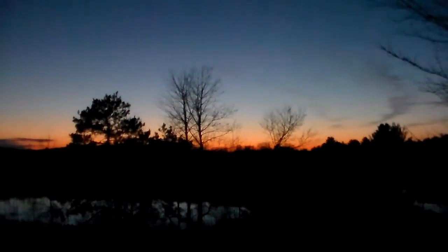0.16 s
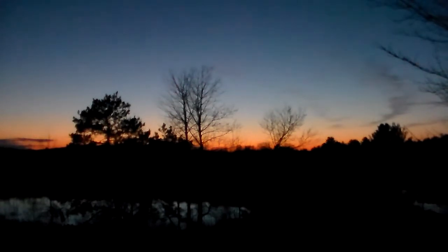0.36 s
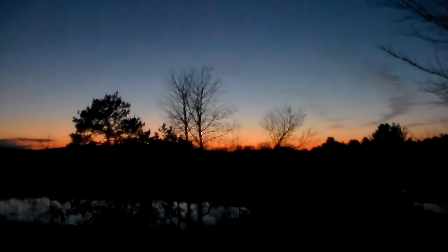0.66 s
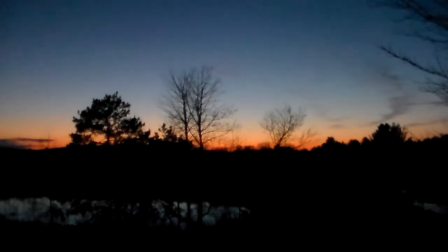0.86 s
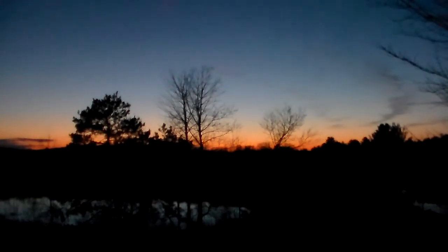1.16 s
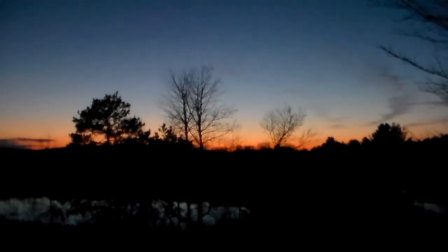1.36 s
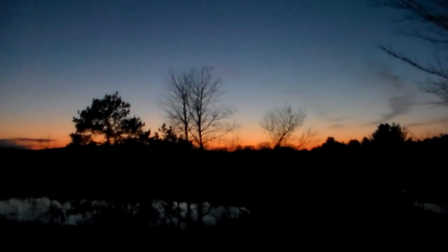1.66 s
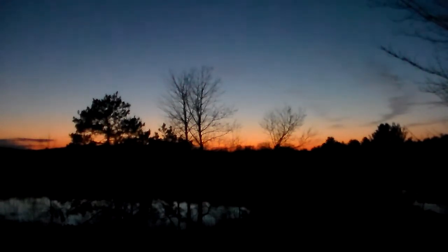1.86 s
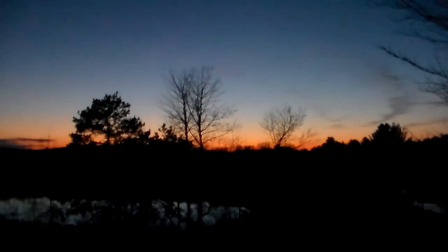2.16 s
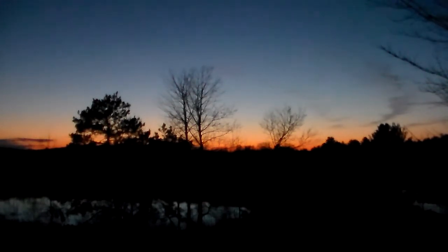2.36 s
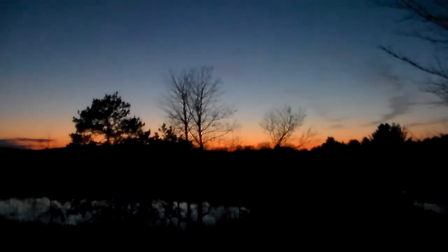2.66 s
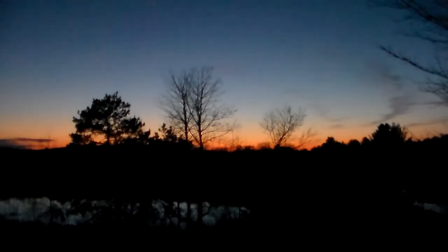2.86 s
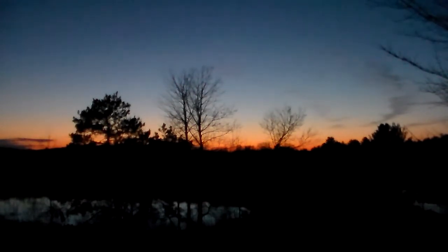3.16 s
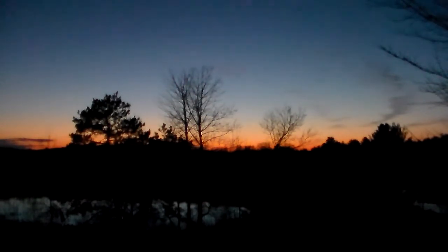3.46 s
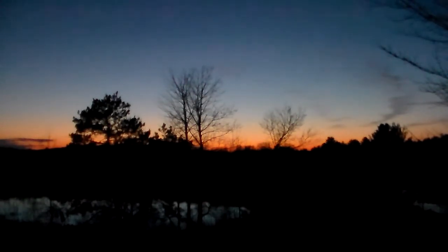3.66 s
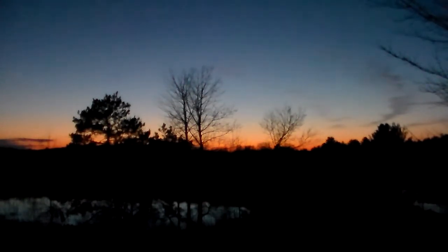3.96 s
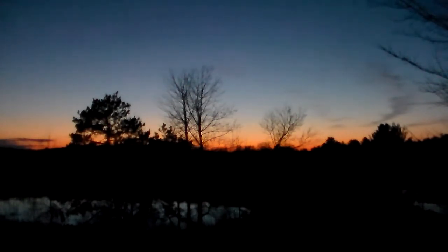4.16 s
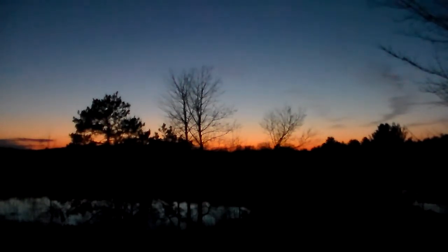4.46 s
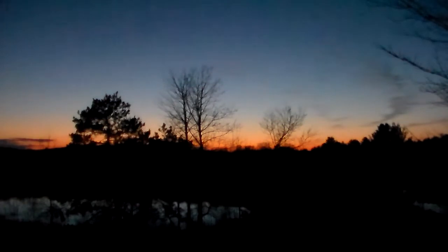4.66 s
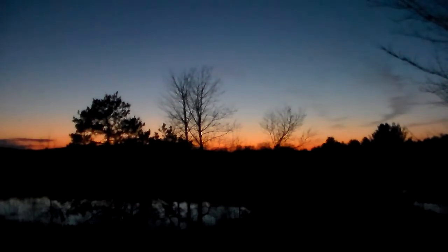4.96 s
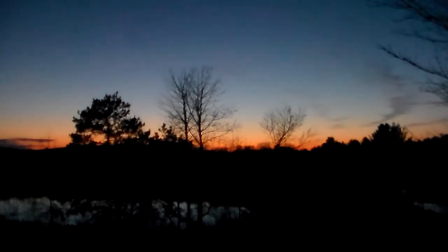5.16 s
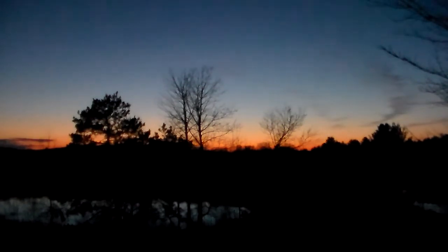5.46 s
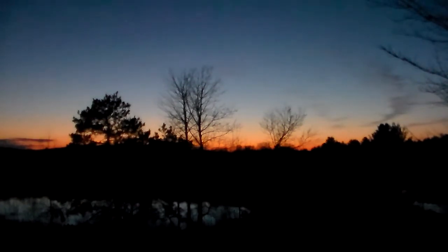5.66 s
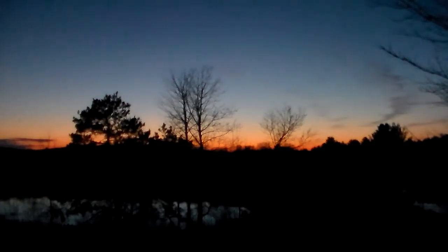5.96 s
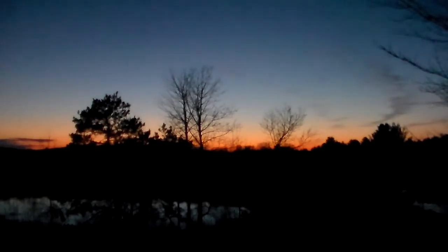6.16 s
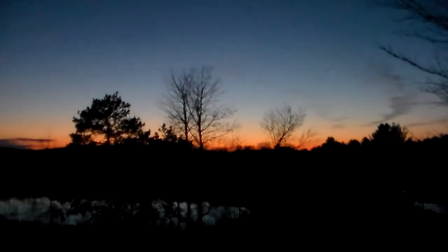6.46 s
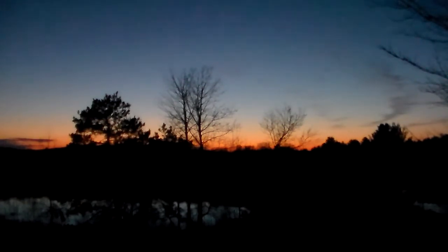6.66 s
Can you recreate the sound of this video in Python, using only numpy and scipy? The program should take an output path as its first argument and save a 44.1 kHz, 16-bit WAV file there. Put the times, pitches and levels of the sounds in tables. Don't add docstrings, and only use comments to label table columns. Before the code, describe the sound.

A marsh at dusk, heard in stereo through a small camera microphone. A dense, continuous crowd of tiny frogs shimmers in the distance while nearer ones give short, clear rising peeps, higher on the left and lower on the right. A vehicle's low rumble and tyre haze draw away early. Faint bird chips, whistles and three tiny nasal buzzes slip between the peeps, over light hiss.

```python
import sys
import numpy as np
from scipy import signal
from scipy.fft import rfft, irfft, next_fast_len
from scipy.io import wavfile
from scipy.ndimage import uniform_filter1d

SR = 44100
rng = np.random.default_rng(int(sys.argv[2]) if len(sys.argv) > 2 else 0)


def generate_wav(sig):
    pcm = np.round(np.clip(np.atleast_2d(sig).T, -1, 1) * 32767).astype(np.int16)
    wavfile.write(sys.argv[1], SR, pcm)


def gain_from_decibels(decibels):
    exponent = np.asarray(decibels, float) / 20
    return 10 ** exponent


N = 300321

# time in seconds, engine rumble in dB, tyre haze in dB.
TRAFFIC_LEVELS = [
    (0, -42, -40),
    (.3, -44.5, -43.5),
    (.85, -45, -43.5),
    (1.2, -51, -44.5),
    (1.9, -47, -45),
    (2.5, -50.5, -45),
    (4.2, -52, -45),
    (5.6, -52, -44),
    (6.81, -52.5, -44.5),
]
# pitch in Hz, level in dB per Hz.
RUMBLE_COLOUR = [(20, 1.5), (45, 0), (110, -1), (200, 0), (250, 2), (500, -80)]
DRONE_COLOUR = [(100, -56), (230, -9), (290, 5.5), (350, -4.5), (420, -1), (600, -5), (1200, -77)]
HAZE_COLOUR = [(480, -11), (650, -7.5), (850, -0.5), (1100, -2.5), (1500, -8.5), (2100, -14.5), (3600, -18),
               (4900, -41), (7000, -70)]
# pitch in Hz, likeness from 0 to 1.
ROAD_LIKENESS = [(60, 0.81), (300, 0.98), (700, 0.92), (2000, 0.83), (5000, 0.49)]
# pitch in Hz, width in Hz, level in dB.
ENGINE_TONES = [
    (673, 50, -55),
    (856.4, 24, -59.5),
    (1552, 37, -63.5),
]
# time in seconds, level in dB.
CHORUS_LEVELS = [(0, -27), (.45, -29.5), (.9, -29), (1.3, -27.5), (1.8, -28.5), (2.3, -28.5), (2.8, -29),
                 (3.2, -29.5), (3.6, -28), (4, -29.5), (4.3, -30), (4.7, -27.5), (5.2, -29), (5.7, -28),
                 (6.2, -29), (6.81, -28.5)]
# pitch in Hz, level in dB.
CROWD_COLOUR = [(2280, -30), (2400, -11.5), (2580, -1), (3000, 0.5), (3150, -10), (3240, -18.5),
                (3620, -41), (3850, -25), (4500, -27), (4800, -47), (5100, -46), (5600, -36), (5900, -44.5),
                (6200, -61)]
# start in seconds, length in seconds, start and end pitch in Hz, peak in dB.
FAINT_WHISTLES = [(.13, .25, 1890, 1985, -55), (2.74, .21, 1900, 1980, -55), (4.74, .1, 1990, 1900, -59),
                  (4.82, .19, 1900, 1990, -55), (.735, .08, 2420, 2240, -49), (.79, .09, 2225, 2370, -49),
                  (3.35, .07, 2380, 2240, -50), (3.4, .09, 2240, 2320, -50), (4.69, .07, 2380, 2240, -52),
                  (4.74, .08, 2240, 2320, -52), (4.27, .17, 2080, 2190, -58), (-.01, .065, 4090, 4330, -44),
                  (6.05, .12, 2240, 2220, -58), (3.42, .06, 3900, 3540, -48), (5.32, .07, 1150, 1170, -48),
                  (1.585, .16, 2330, 2470, -40), (3.99, .14, 2290, 2450, -39),
                  (3.375, .05, 4170, 4280, -45)]
# time in seconds, peak in dB.
FALLING_CHIPS = [
    (0.7994, -55),
    (0.8545, -35),
    (1.294, -39),
    (2.3645, -38),
    (3.4203, -38),
    (4.2004, -36),
    (5.5717, -35),
]
# time in seconds, peak in dB, pitch in Hz.
LEVEL_CHIPS = [
    (0.8175, -58, 4250),
    (1.3234, -58.5, 4180),
    (4.7461, -57, 4170),
    (5.5378, -57.5, 4150),
    (6.2876, -55, 4150),
]
# start in seconds, length in seconds, level in dB.
BUZZ_CALLS = [
    (0.138, .21, -58.5),
    (2.881, 0.2, -59.5),
    (5.545, 0.22, -58),
]
# pitch in Hz, level in dB.
BEAK_COLOUR = [(3900, -7), (4500, -2), (5000, -4), (5410, 0), (5800, -7), (6500, -18)]
# start in seconds, length in seconds, peak in dB.
HIGH_PEEPS = [
    (.722, .105, -33.5),
    (2.1, .125, -33),
    (3.468, .125, -34.5),
    (4.965, .115, -34),
    (6.118, .105, -33.5),
]
LOW_PEEPS = [
    (1.6, .3, -46),
    (3.88, .27, -47),
    (6.165, .24, -46),
]
# length in seconds, start and end pitch in Hz, peak in dB, left over right in dB.
LEFT_VOICES = [
    (.09, 3180, 3300, -43.5, .8),
    (.1, 3065, 3180, -30.5, 1.5),
    (.13, 2870, 3100, -31.3, 5.5),
    (.07, 2930, 3080, -27, 3.5),
    (.18, 2845, 3210, -35.2, 2),
    (.18, 2750, 3040, -33, 4),
    (.1, 2770, 3000, -29.5, 4),
    (.08, 3255, 3345, -43.5, 0),
]
# start times in seconds, for one frog.
LEFT_TIMES = [
    (.83, 2.042, 3.886, 5.105, 6.27),
    (.1, .29, 1.44, 2.724, 3.661, 4.118, 5.07, 5.33, 5.787, 6.648),
    (.232, 1.394, 2.28, 3.855, 3.989, 4.339, 5.749, 6.686),
    (1.82, 3.947, 5.105),
    (0, .747, 2.194, 4.659, 6.01, 6.59),
    (.24, .872, 1.105, 1.943, 2.674, 5.15, 5.269, 5.45, 6.145),
    (1.848, 1.92, 3.162, 4.565, 4.715, 5.81),
    (.36, 1.575, 3.03),
]
# length in seconds, start and end pitch in Hz, peak in dB, left over right in dB.
RIGHT_VOICES = [(.18, 2335, 2640, -30.5, -1), (.075, 2340, 2410, -33.5, -1), (.12, 2265, 2450, -35, -.5),
                (.1, 2325, 2435, -38.5, -1), (.13, 2410, 2610, -33.5, -2), (.18, 2395, 2680, -35, -3.5),
                (.18, 2490, 2860, -33.3, -4), (.26, 2480, 2890, -34.2, -1.5),
                (.13, 2480, 2790, -30.5, -4.5), (.08, 2610, 2770, -28, -5), (.13, 2690, 2960, -31.2, -1.5),
                (.18, 2595, 2930, -33.4, -1.6), (.06, 2470, 2580, -28, -1.1), (.06, 2745, 2835, -26, -1.6)]
# start times in seconds, for one frog.
RIGHT_TIMES = [(.895, 2.175, 3.53, 4.731), (0, 1.257, 2.309, 3.406, 4.434, 5.935), (.968, 2.663, 5.47),
               (.225, 2.88, 4.274, 5.543),
               (1.525, 2.915, 3.379, 3.535, 4.053, 5.109, 5.573, 5.768, 6.24, 6.455),
               (.06, 1.28, 2.12, 2.347, 2.579, 2.68, 3.333, 4.7, 5.23),
               (.008, .175, .63, 2.389, 4.555, 5.41, 5.528, 5.85, 5.943),
               (1.078, 1.105, 1.49, 2.19, 4.66, 6.2), (1.12, 1.955, 2.415, 3.125, 3.34, 4.484, 4.985),
               (.165, 1.51, 2.225, 4.069, 4.305, 5.44), (.93, 1.79, 3.375, 4.055, 4.74, 5.585),
               (2.925, 4.41, 6.525), (2.665, 3.87, 4.875), (.236, 6.762)]
# pitch in Hz, level in dB per Hz.
HISS_COLOUR = [(1500, -40), (4000, 0.5), (8000, -4), (14000, -6)]
# pitch in Hz, level in dB.
WHINE_TONES = [
    (7792, -91),
    (7822, -88),
    (7852, -77.5),
    (7882, -79),
    (7912, -93),
]


def unit(x):
    return x / np.sqrt(np.mean(x ** 2) + 1e-20)


def along(points, hz):
    f, v = np.transpose(points)
    return np.interp(np.log(hz + 1), np.log(f + 1), v)


def curves(rows):
    s, *columns = np.transpose(rows)
    return [np.interp(np.arange(N) / SR, s, column) for column in columns]


def filtered(x, response):
    m = next_fast_len(N + SR // 2)
    return irfft(rfft(x, m) * response(np.fft.rfftfreq(m, 1 / SR)), m)[..., :N]


def smooth_noise(count, size):
    return unit(uniform_filter1d(rng.standard_normal(count), size=size))


def rush(colour, likeness, patchy_db=0.):
    z = signal.stft(rng.standard_normal((2, N)), nperseg=2048)[2]
    patches = uniform_filter1d(rng.standard_normal(z.shape[1:]), size=4, axis=0)
    patches = unit(uniform_filter1d(patches, size=5, axis=1))
    pair = signal.istft(z * gain_from_decibels(patchy_db * patches), nperseg=2048)[1][:, :N]

    def middle_and_side(hz):
        turn = np.arccos(np.clip(along(likeness, hz), -1, 1)) / 2
        return gain_from_decibels(along(colour, hz)) * np.array([np.cos(turn), np.sin(turn)])

    mid, side = filtered(pair, middle_and_side)
    return unit(np.array([mid + side, mid - side]))


def reeds(x, t60=0.31):
    t = np.arange(SR // 3) / SR
    tail = rng.standard_normal((2, len(t))) * gain_from_decibels(-60 * t / t60)
    return signal.fftconvolve(x, tail / np.linalg.norm(tail[0]), axes=1)[:, :N]


def whistle(rows, rise, fall, spread, odd_db=-90, octave_db=-90, shimmer=0., bend=1., fade_db=0.):
    out = np.zeros((2, N + 2 * SR))
    air = uniform_filter1d(uniform_filter1d(rng.standard_normal((2, 2 * SR)), size=350), size=350)
    air = unit(air[0]) + 1j * unit(air[1])
    luck = rng.standard_normal((len(rows), 3))
    for (s, length, start_hz, end_hz, db, pan_db), (phase, lag, at) in zip(rows, luck):
        t = np.arange(round(length * SR)) / SR
        ramp = np.clip(np.minimum(t / rise, (length - t) / fall), 0, 1)
        swell = np.sin(np.pi / 2 * ramp) ** 2 * gain_from_decibels(fade_db * (t / length) ** 2)
        hz = end_hz - (end_hz - start_hz) * (1 - t / length) ** (1 / bend)
        half = np.exp(1j * np.pi * (np.cumsum(hz) / SR + phase))
        tone = half * half * (1 + half * (gain_from_decibels(odd_db) + gain_from_decibels(octave_db) * half))
        waver = 1 + shimmer * air[int(at % 1 * SR):][:len(t)]
        tone *= waver / np.sqrt(1 + 2 * shimmer ** 2)
        ports = gain_from_decibels([[db + pan_db / 2], [db - pan_db / 2]])
        ports = ports * np.exp(1j * spread * lag * np.array([[1], [-1]]))
        out[:, round((s + 1) * SR):][:, :len(t)] += swell * (ports * tone).imag
    return out[:, SR:SR + N]


def traffic():
    rumble_db, haze_db = curves(TRAFFIC_LEVELS)
    drone_db = -48 + 2.52 * (haze_db + 45)
    road = gain_from_decibels(rumble_db) * rush(RUMBLE_COLOUR, ROAD_LIKENESS, patchy_db=0.95)
    road += gain_from_decibels(drone_db) * rush(DRONE_COLOUR, ROAD_LIKENESS, patchy_db=1.03)
    road += gain_from_decibels(haze_db) * rush(HAZE_COLOUR, ROAD_LIKENESS, patchy_db=1.9)
    for hz, width, db in ENGINE_TONES:
        swell = gain_from_decibels(db + 2.5 * smooth_noise(N, 20000))
        tone = filtered(rng.standard_normal(N), lambda f: 1 / (1 + 2j * (f - hz) / width))
        road += swell * unit(tone)
    return road * gain_from_decibels([[-.5], [.5]])


def far_frogs(count=1600):
    when, size, pitch, glide, near, side = rng.random((count, 6)).T
    turn = np.arange(count)
    start = (turn + when) / count * (N / SR + .2) - .2
    pitch = (.618 * turn + .3 * pitch) % 1
    length = .09 + .09 * size
    middle_hz = 2350 + 850 * pitch
    climb_hz = length * (300 + 800 * glide)
    rows = np.transpose([start, length, middle_hz - climb_hz, middle_hz + climb_hz,
                         -8 * near, 8 * (side - .55)])
    crowd = whistle(rows, rise=.03, fall=.025, spread=.43, odd_db=0, octave_db=0, shimmer=.32, bend=.8)
    crowd = crowd + gain_from_decibels(-9) * reeds(crowd)
    level_db, = curves(CHORUS_LEVELS)
    return gain_from_decibels(level_db) * unit(filtered(crowd, lambda hz: gain_from_decibels(along(CROWD_COLOUR, hz))))


def faint_whistles():
    rows = [(*row, 0) for row in FAINT_WHISTLES]
    return whistle(rows, rise=.03, fall=.03, spread=.3, shimmer=.12)


def chips():
    ticks = [(s - .004, .013, 3780, 3620, db - 7, 0) for s, db in FALLING_CHIPS]
    notes = [(s - .012, .05, hz - 30, hz + 30, db + 8.5, 0) for s, db, hz in LEVEL_CHIPS]
    return (whistle(ticks, rise=0.0026, fall=0.0041, spread=0.27)
            + whistle(notes, rise=0.0082, fall=0.01, spread=0.45, shimmer=0.35))


def buzz(carrier_hz=5385, arch_hz=35, rate_hz=195):
    t = np.arange(N) / SR
    arch, effort = np.zeros(N), np.zeros(N)
    for s, length, db in BUZZ_CALLS:
        push = np.sin(np.pi * np.clip((t - s) / length, 0, 1))
        arch += push
        effort += gain_from_decibels(db) * np.sqrt(np.abs(push)) * (t > s) * (t < s + length)
    flutter_hz = 6 * smooth_noise(N, 400)
    carrier = np.sin(2 * np.pi * np.cumsum(carrier_hz + arch_hz * arch + flutter_hz) / SR)
    clicks = (rate_hz * t) % 1 < .04

    def beak(hz):
        return gain_from_decibels(along(BEAK_COLOUR, hz)) * (hz > 3500) * (hz < 7500)

    return effort * unit(filtered((clicks + .004) * carrier, beak))


def lone_frogs():
    high = [(s, length, 3190, 3490, db, 2) for s, length, db in HIGH_PEEPS]
    low = [(s, length, 2200, 2400, db - 1.5, 0) for s, length, db in LOW_PEEPS]
    return (whistle(high, rise=.025, fall=.015, spread=.2, odd_db=-40, shimmer=.16, bend=.45, fade_db=-21)
            + whistle(low, rise=.04, fall=.03, spread=.2, shimmer=.1, bend=1.5, fade_db=7))


def near_frogs(vary_hz=8.03, vary_db=-0.14):
    rows = []
    for voices, calls in [(LEFT_VOICES, LEFT_TIMES), (RIGHT_VOICES, RIGHT_TIMES)]:
        for (length, start_hz, end_hz, db, pan_db), times in zip(voices, calls):
            for s in times:
                a, b, c = rng.standard_normal(3)
                rows.append((s, length, start_hz + vary_hz * a, end_hz + vary_hz * b, db + vary_db * c, pan_db))
    return whistle(rows, rise=0.034, fall=0.028, spread=0.14, odd_db=-34, octave_db=-47, shimmer=0.13, bend=.8)


def scene():
    background = traffic() + far_frogs()
    faint_calls = faint_whistles() + chips() + buzz()
    near = faint_calls + lone_frogs() + near_frogs()
    return background + near + gain_from_decibels(-11.5) * reeds(near)


def band_limit(x):
    return signal.sosfilt(signal.butter(12, 14170, fs=SR, output="sos"), x)


def record(dry):
    t = np.arange(N) / SR
    hum = gain_from_decibels(-54.5) * np.sin(2 * np.pi * 29.97 * t)
    whine = sum(gain_from_decibels(db) * np.sin(2 * np.pi * hz * t + k) for k, (hz, db) in enumerate(WHINE_TONES))
    hiss = gain_from_decibels(-57.0) * rush(HISS_COLOUR, [(1000, 0)])
    mix = filtered(dry + hum + whine + hiss, lambda hz: hz < 14230)
    return band_limit(mix)


dry = scene()
out = record(dry)
generate_wav(out)
```